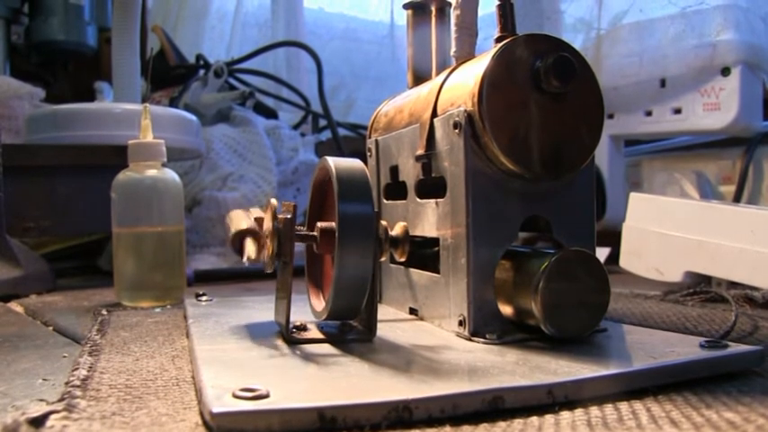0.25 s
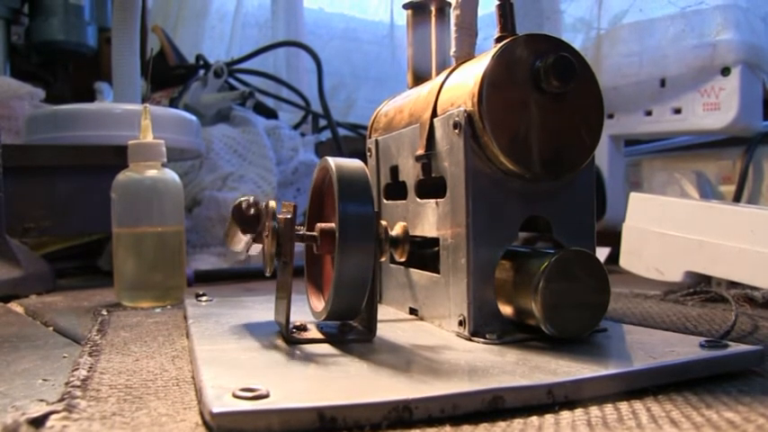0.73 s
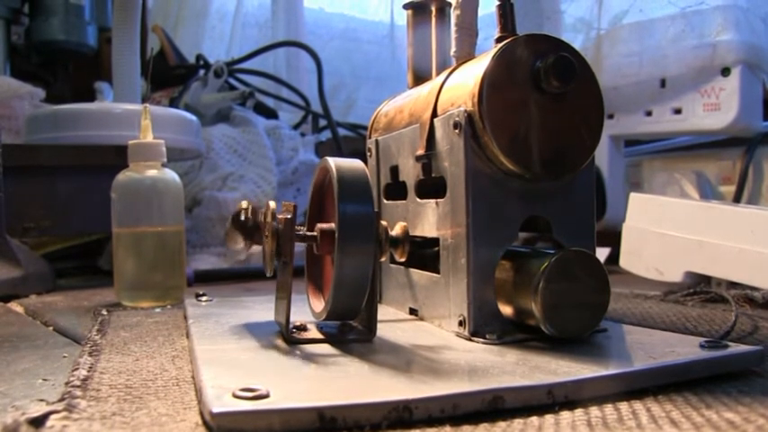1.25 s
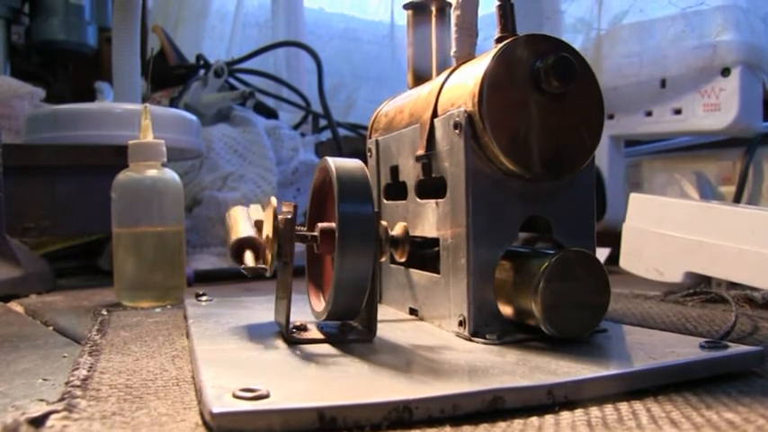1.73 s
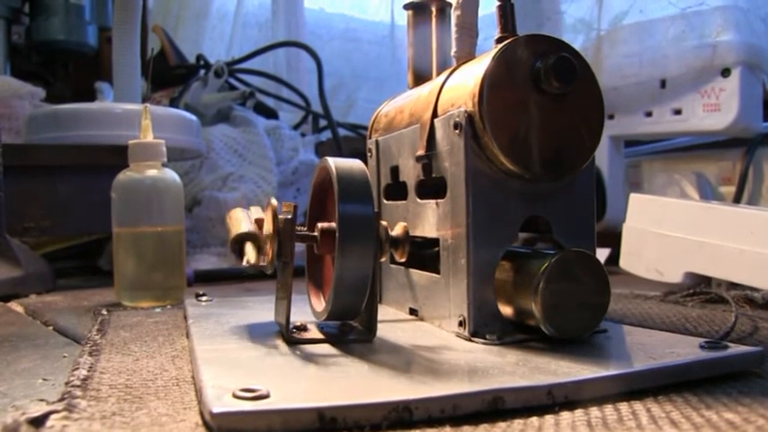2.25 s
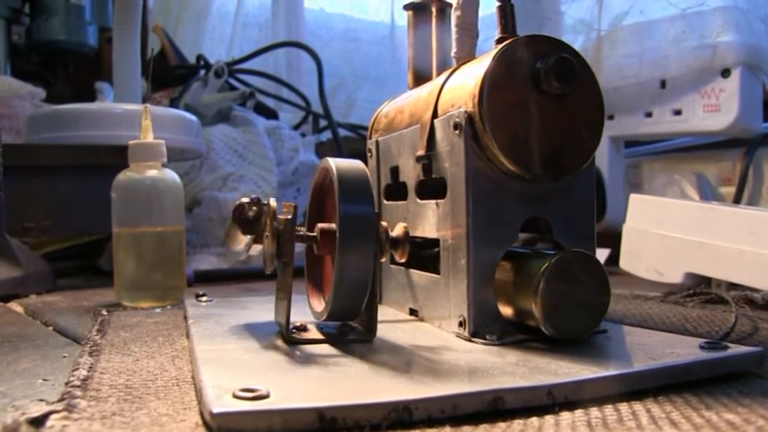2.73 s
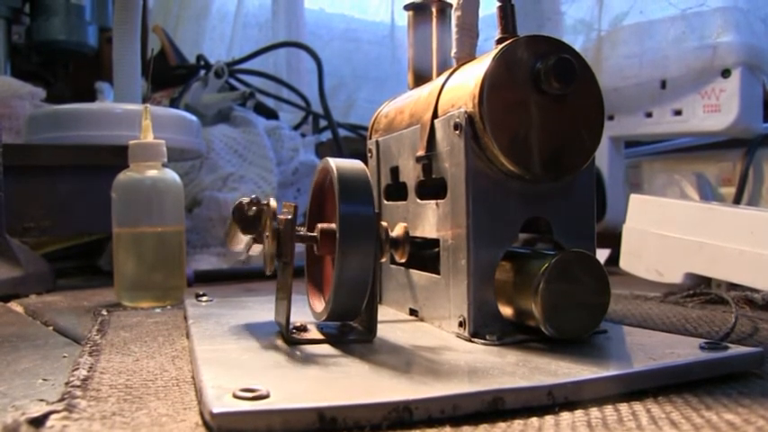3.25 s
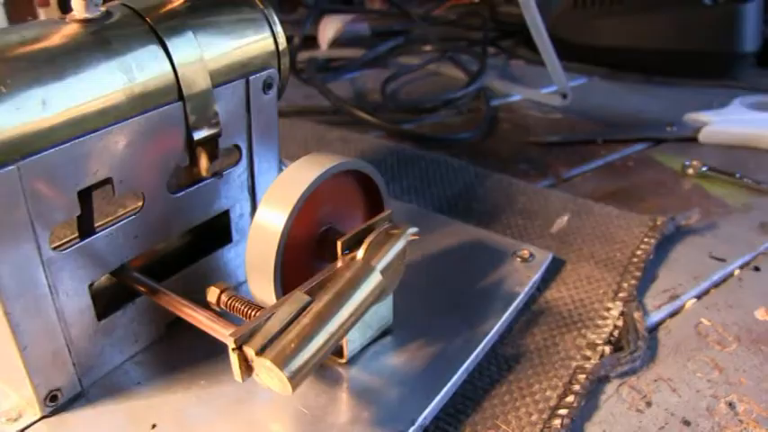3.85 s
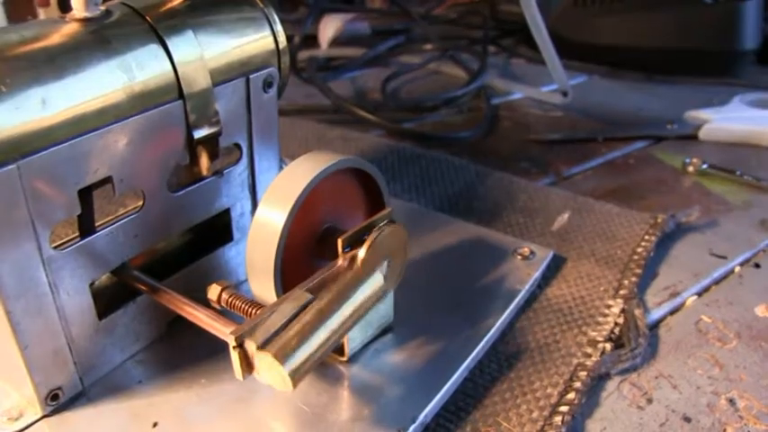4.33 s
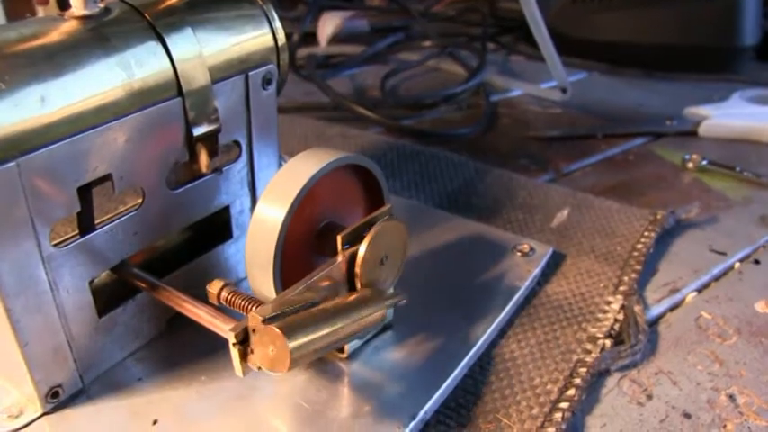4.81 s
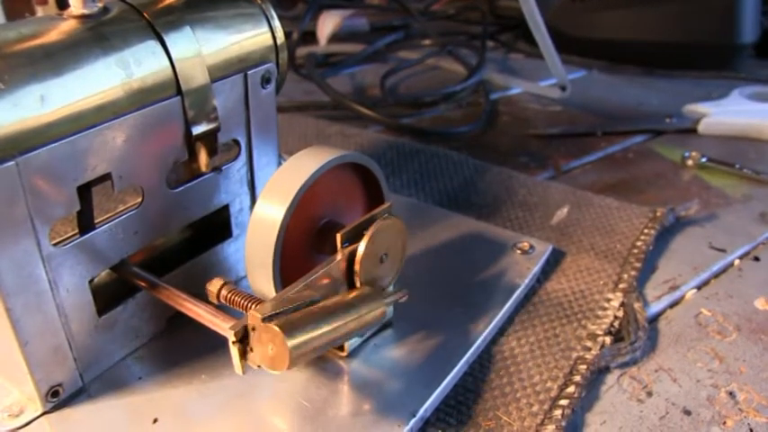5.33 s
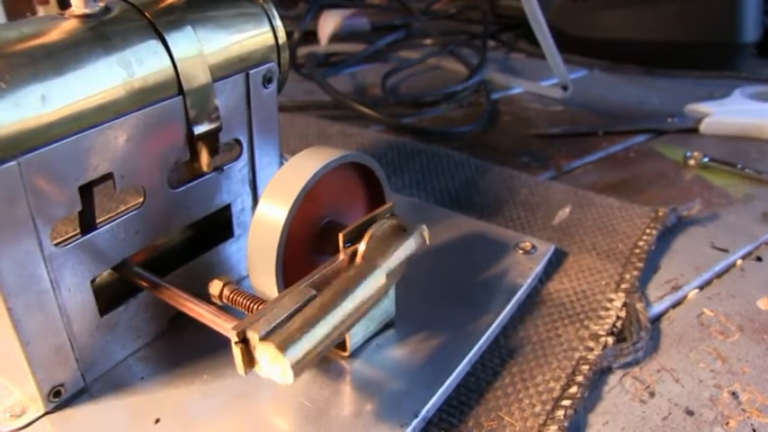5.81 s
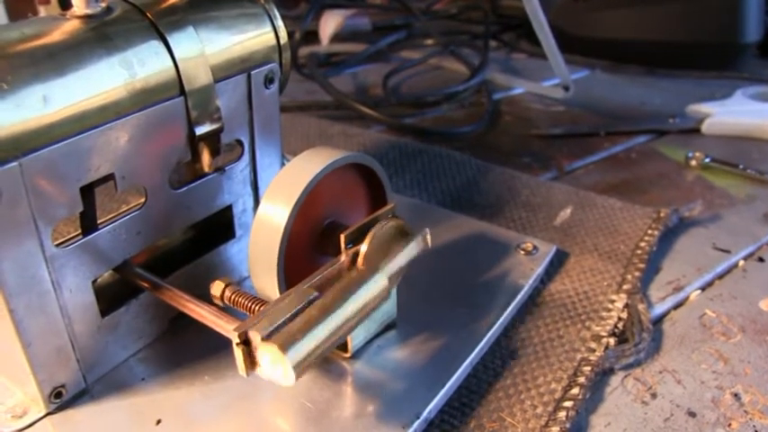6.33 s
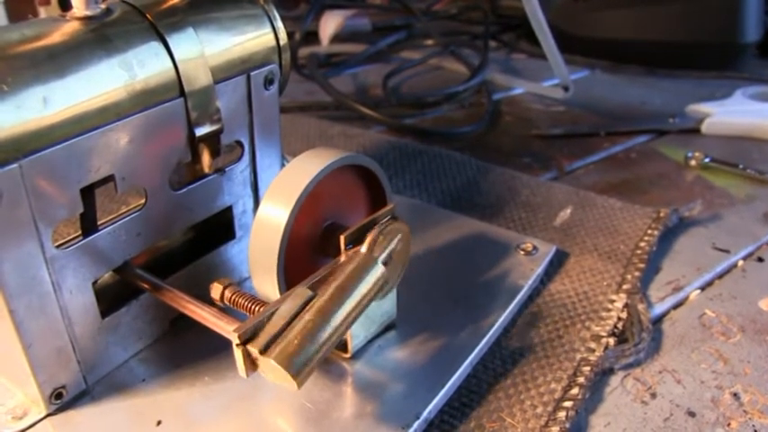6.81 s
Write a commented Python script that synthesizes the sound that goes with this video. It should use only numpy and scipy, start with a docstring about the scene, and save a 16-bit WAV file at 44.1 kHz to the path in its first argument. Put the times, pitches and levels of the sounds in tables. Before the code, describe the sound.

A toy steam engine runs with a fast, even metallic clatter over a steady hiss of leaking steam.

```python
"""On a workbench, a toy steam engine runs on a metal base plate. We listen from beside the boiler,
then, after a tiny gap, from above the cylinder. A low drone comes from far off, the burner's flame
flutters and leaking steam hisses. On every turn the slack (free play) in the crank opens with a tick
and closes with a knock, so the frame and plate ring, while the bench thuds and the exhaust port puffs."""
import sys
import numpy as np
from scipy import signal
from scipy.fft import rfft, irfft, next_fast_len
from scipy.io import wavfile
from scipy.ndimage import uniform_filter1d, map_coordinates

SR = 44100
rng = np.random.default_rng(int(sys.argv[2]) if len(sys.argv) > 2 else 0)


def unload_audio(sound):
    """Save the sound as a 16-bit wav file, at the path given as the first command line argument."""
    columns = np.transpose(np.atleast_2d(sound))
    # keep every value between -1 and 1, then stretch to whole-number steps
    steps = np.round(np.clip(columns, -1, 1) * 32767)
    wavfile.write(sys.argv[1], SR, steps.astype(np.int16))


N = 311346
BESIDE, ABOVE = 0, 1  # the listening places; anything "per place" is a pair in this order

# How long the room echoes: (frequency [Hz], time to fade by 60 dB [s])
ROOM_FADE = [(150, 0.39), (1500, 0.074), (6000, 0.079)]
# The far drone: (time [s], pitch [Hz], base level [dB])
DRONE_PATH = [(0.0, 86, -66), (2.0, 86, -64), (2.2, 71, -62), (2.55, 76, -57), (2.75, 80.3, -51.5),
              (3.1, 80, -57), (3.44, 78.7, -64), (3.62, 78, -50), (3.83, 79.8, -48), (3.89, 82, -68),
              (4.4, 85.8, -61), (5.3, 90, -57), (5.45, 87, -66), (7.06, 83, -66)]
# How alike flame or steam noise is in both ears, per place: (frequency [Hz], likeness [0 to 1])
EAR_LIKENESS = [(60, 0.17), (130, 0.17), (290, 0.55), (640, 0.49), (1410, 0.51), (3100, 0.66), (6820, 0.64),
                (15000, 0.58)], [(60, 0.25), (130, 0.18), (290, 0.7), (640, 0.5), (1410, 0.64),
                (3100, 0.44), (6820, 0.14), (15000, 0.69)]
# Which way that noise leans, per place: (frequency [Hz], left minus right [dB])
EAR_BALANCE = [(60, 29), (110, -2), (200, 4.5), (380, -3), (700, -3), (1290, -1.5), (2380, 0), (4400, -0.5),
               (8120, -0.5), (15000, 0.0)], [(60, 13), (110, 12), (200, -0.5), (380, -1.0), (700, -4),
               (1290, -6), (2380, 0.5), (4400, 4.0), (8120, 7), (15000, 1.5)]
# Tone colour of the flame, per place: (frequency [Hz], relative level [dB])
FLAME_COLOUR = [(15, -51), (25, -28), (81, -8.5), (134, -10.5), (193, -2.5), (324, -2), (401, -0.5),
                (459, -3.5), (1030, -6), (1600, -11.5), (1910, -11), (2230, -15.5), (2500, -20),
                (3250, -43), (5500, -120)], [(15, -55), (25, -20), (129, -8.5), (182, -7), (273, -2.5),
                (386, -4.5), (556, -9.5), (772, -7), (1250, -9), (1460, -16.5), (1770, -14), (2310, -17),
                (2500, -24), (3250, -50), (5500, -120)]
# Tone colour of the leak, per place: (frequency [Hz], relative level [dB])
STEAM_COLOUR = [(880, -37), (1500, -9.5), (1620, -21), (1900, -19), (2270, -11.5), (2870, -9.5), (3110, -9),
                (4060, -8.5), (4700, -10.5), (6450, -7), (8170, -7), (8660, -6), (9280, -4), (12700, -2.5),
                (15800, -7.5)], [(880, -28.5), (1500, -17), (1770, -18), (2310, -19.5), (2480, -14),
                (3400, -15.5), (3980, -12.5), (6710, -11), (7620, -9), (8840, -8), (9470, -7),
                (10900, -6.5), (12200, -5.5), (14000, -7.5), (15800, -13)]
# Bands of hiss lifted by reflections off plate and boiler, per place:
# (frequency [Hz], width [Hz], boost [dB])
STEAM_LIFTS = ([(4740, 370, 7.5), (5620, 510, 5.5), (6980, 200, 6), (8120, 500, 7.5), (9120, 200, 4.5),
               (9480, 190, 4), (10170, 300, 4.5), (12850, 370, 3)], [(4950, 270, 0), (7680, 330, 4),
               (9520, 360, 4.5), (10330, 200, 4), (10800, 240, 1), (11750, 250, 3), (12600, 600, 4),
               (13600, 150, 5)])
# The exhaust puff, per place: (start after the tick [ms], peak treble boost [dB])
EXHAUST_PUFF = [(90, 2.2), (86, 2.6)]
# The bench's low tones, per place:
# (frequency [Hz], start after the tick [ms], swell time [ms], base level [dB])
BENCH_TONES = ([(136, 14.6, 13.9, -42.6), (243.4, 18.25, 6.8, -48), (412, 21, 3.3, -43),
               (435, 29, 2.16, -43), (616, 0.86, 5.7, -42)], [(136.7, 12.5, 15.8, -49.5),
               (259.8, 10.5, 7.8, -45), (266.5, 27.5, 9.1, -45), (430, -2, 1.67, -46),
               (502, 17.5, 3.7, -55.5), (415, 22.5, 4.5, -46.5)])
# The ringing tones of frame and plate, with their base levels:
# (frequency [Hz], time to fade by 60 dB before FADE_SPEEDUP [s], knock beside [dB], tick beside [dB],
#  knock above [dB], tick above [dB], left minus right beside [dB], left minus right above [dB])
FRAME_TONES = [(611, 0.059, -52, -37.5, -63, -48, 7.5, 4), (803, 0.043, -43, -53, -32.5, -38, -2, 1),
               (975, 0.061, -50, -50.5, -37.5, -39.5, -8, 4), (1170, 0.05, -48, -46, -33, -34, 4, 0),
               (1297, 0.038, -39, -46, -29.5, -45, -5, 6), (1401, 0.052, -42, -44, -22.5, -31.5, 5, -2.5),
               (1505, 0.058, -44, -39.5, -25.5, -28.5, 0, 4),
               (1631, 0.032, -31, -43.5, -28, -32.5, -1.5, 2), (1850, 0.027, -45, -46, -80, -55, 0, -4),
               (1990, 0.036, -42, -43, -39, -48, -6, -15), (2266, 0.045, -33.5, -40.5, -29, -37.5, -2, 4),
               (2513, 0.03, -32.5, -46, -42, -58, 4, -23), (2568, 0.059, -37.5, -43, -41, -45, -4, 11),
               (2816, .025, -33.5, -56, -39, -50, -1, 8), (3193, 0.039, -52, -55, -41.5, -54, -5, 5),
               (3370, 0.026, -55, -53, -52, -66, 2, 4), (3733, 0.024, -42, -54, -40, -68, -7, -12),
               (3990, 0.039, -67, -57, -42.5, -62, 0, 2), (4550, 0.024, -39.5, -66, -36, -62, -2, 7.5),
               (4850, 0.014, -42, -64, -37.5, -64, -15, 11), (5040, 0.033, -61, -66, -37, -66, 0, 1),
               (5500, 0.033, -41.5, -61, -59, -68, 2, 2), (5520, .02, -52, -63, -43, -66, 0, 2)]
# Small bounces after a tick and after a knock, per place:
# (delay [ms], level change [dB], brightness above 1400 Hz [dB per octave])
TICK_BOUNCES = [(5.05, 2, 3), (10.92, 0, -6), (39.56, 2, -10), (54.2, -7, -5)], [(6.99, -12, 10),
                (11.92, -7.5, -4), (48, -17, -4)]
KNOCK_BOUNCES = [(4.5, -3, -1), (9, -16.5, -2), (15, -6, -14)], [(5.5, -11.5, 5.7), (11, -22, 2.3),
                 (17, -16, 3)]
# The slack closes once a turn: (time [s], strength [dB], sharpness above 2000 Hz [dB per octave])
CRANK_KNOCKS = [(-0.0194, 0, 0), (0.1145, 3, 2.0), (0.2484, 2, 2.5), (0.3822, 0, 1.0), (0.5155, 0.9, 0.5),
                (0.6489, 1, 0.7), (0.782, 1.5, 0.5), (0.9151, 0.5, 0), (1.0485, 0.5, 0), (1.1814, 2, 1.5),
                (1.3143, 2.2, 2), (1.4472, 1.5, -2), (1.5801, -14, -3), (1.713, 1.3, 0.9), (1.8454, 2, 3.5),
                (1.9789, 0.3, -1.0), (2.1116, -6, -6), (2.2442, 0, -2), (2.3766, 1.8, -3.7),
                (2.5083, 2.5, 0.9), (2.6399, 0.5, -2), (2.7708, 4.0, 1.5), (2.902, 1.5, 3),
                (3.0333, 0, 1.7), (3.1647, -1, -1.9), (3.2954, 0.5, -1), (3.426, -0.0, 2),
                (3.5568, 0.5, 0.3), (3.6875, -1, 0.5), (3.8178, 0, 2.5), (3.8863, 1.5, 4),
                (4.015, 0.2, 1.5), (4.1435, 0.8, -3), (4.2723, -1.5, -6), (4.4005, 1.5, 3),
                (4.5294, 1.5, 2.5), (4.6595, -0.8, -2.2), (4.7889, 1, 1.5), (4.9186, 0, 3),
                (5.0498, -4, -1), (5.1801, -0.5, 1), (5.3111, -4, -6.0), (5.441, 1, 4), (5.5717, -0.5, 2),
                (5.702, -1.8, -6), (5.8316, -1.5, 1.0), (5.961, -12, -6), (6.0906, -0.7, -1),
                (6.22, -2.8, -4.5), (6.3496, -2, -3.4), (6.4784, 2, 3), (6.6076, 1, 1), (6.737, -11, -3),
                (6.8662, -9.5, -8), (6.996, -4, -8)]

GAP_START_S, GAP_END_S = 3.8668, 3.8724  # near silence between the two places
SLACK_MS = 18.1  # the tick comes this long before the knock
FADE_SPEEDUP = 1.294, 1.3  # per place: the metal's ring dies this many times faster
TICK_DB, THUD_DB = (-3.3, -2.5), (0.6, 2.4)  # per place, added to the base levels
STEAM_DB, BURNER_DB = (-39.1, -35.1), (-47, -44)  # base levels per place


def amp(db):
    """Turn decibels into a number to multiply by."""
    return 10 ** (np.asarray(db) / 20)


def unit(x):
    """Scale a signal to an average (rms) size of 1."""
    return x / np.sqrt(np.mean(x ** 2) + 1e-20)


def along(points, hz):
    """Read between (frequency, value) points, on a scale of octaves."""
    freqs, values = np.transpose(points)
    return np.interp(np.log(hz + 1), np.log(freqs + 1), values)


def wobble(rate):
    """A smooth curve through `rate` random values a second."""
    return map_coordinates(rng.standard_normal(int(N * rate / SR) + 4), [np.arange(N) * rate / SR])


def filtered(x, response):
    """Turn each frequency of x up or down by response(hz)."""
    size = next_fast_len(N + 8192)
    return irfft(rfft(x, size) * response(np.fft.rfftfreq(size, 1 / SR)), size)[..., :N]


def rushing_noise(colour_db, place, patchy_db):
    """Stereo noise with a given tone colour and random louder and softer patches."""
    spectrum = signal.stft(rng.standard_normal((2, N)), nperseg=512)[2]
    patches = uniform_filter1d(uniform_filter1d(rng.standard_normal(spectrum.shape[1:]), 6, 0), 8, 1)
    noise = signal.istft(spectrum * amp(patchy_db * unit(patches)), nperseg=512)[1][:, :N]
    spread = lambda hz: np.arccos(np.clip(along(EAR_LIKENESS[place], hz), 0, 1)) / 2
    mid, side = filtered(noise, lambda hz: amp(colour_db(hz)) * [np.cos(spread(hz)), np.sin(spread(hz))])
    balance = lambda hz: amp(np.outer([.5, -.5], along(EAR_BALANCE[place], hz)))
    return unit(filtered(np.array([mid + side, mid - side]), balance))


def knocks_at(place):
    """The knocks heard from this place: beside before the gap, above after it."""
    return [row for row in CRANK_KNOCKS if (row[0] > GAP_START_S) == place]


def tick_times(place):
    """The times, in seconds, when the slack opens."""
    return np.array([s - SLACK_MS / 1000 for s, _, _ in knocks_at(place)])


def swell(place, delay_ms, rise_ms):
    """A bump of height 1 once a turn, starting delay_ms after the tick."""
    t = np.arange(N) / SR
    starts = tick_times(place) + delay_ms / 1000
    latest_start = starts[(np.searchsorted(starts, t) - 1).clip(0)]
    age = (t - latest_start).clip(0) * 1000 / rise_ms
    return age * np.exp(1 - age)


def room(x, echo_db):
    """Add the echo from the walls, in which low notes last longest."""
    hz, t, spectrum = signal.stft(rng.standard_normal((2, SR // 3)), SR, nperseg=256)
    tail = signal.istft(spectrum * amp(-60 * t / along(ROOM_FADE, hz)[:, None]), SR, nperseg=256)[1]
    delayed = np.pad(x, ((0, 0), (200, 0)))
    echo = signal.fftconvolve(delayed, tail / np.linalg.norm(tail[0]), axes=1)[:, :N]
    return x + amp(echo_db) * echo


def drone():
    """A low tone from far off comes and goes, stronger on the left."""
    times, *columns = np.transpose(DRONE_PATH)
    hz, db = [np.interp(np.arange(N) / SR, times, column) for column in columns]
    tone = np.sqrt(2) * np.sin(2 * np.pi * np.cumsum(hz) / SR)
    return tone * amp(db + 1.5 * wobble(7.1)) * amp([[3.6], [-4.6]])


def burner(place):
    """The flame flutters under the boiler."""
    flutter = amp(BURNER_DB[place] + 0.47 * wobble(12))
    return flutter * rushing_noise(lambda hz: along(FLAME_COLOUR[place], hz), place, patchy_db=1.0)


def steam(place):
    """The leak hisses on: its treble puffs at the exhaust, its lower part grows as the cylinder rocks."""
    ripple_db = 1.08 * rng.standard_normal(400)  # many weak reflections ripple the tone colour
    lifts = lambda hz: sum(db / (1 + (2 * (hz - centre) / width) ** 2)
                           for centre, width, db in STEAM_LIFTS[place])
    colour = lambda hz: along(STEAM_COLOUR[place], hz) + map_coordinates(ripple_db, [hz / 60]) + lifts(hz)
    hiss = amp(STEAM_DB[place] + 0.21 * wobble(12)) * rushing_noise(colour, place, patchy_db=0.72)
    lower = filtered(hiss, lambda hz: 1 / (1 + (hz / 6500) ** 8))
    delay_ms, puff_db = EXHAUST_PUFF[place]
    puff = amp(puff_db * swell(place, delay_ms, rise_ms=4.5))
    rocking = amp(1.77 * swell(place, delay_ms=-7.5, rise_ms=16.5))
    return (hiss - lower) * puff + lower * rocking


def bench_thud(tick_s, thud_db, place):
    """Softly pushed, the bench's tones swell, sink and linger. Gives (start sample, sound) pairs."""
    t = np.arange(SR // 10) / SR
    sounds = []
    for hz, delay_ms, swell_ms, db in BENCH_TONES[place]:
        age = t * 1000 / swell_ms
        push = (age * np.exp(1 - age)) ** 3.16
        linger = .5 * age ** 2 / (1 + age ** 2) * np.exp(-age / 2.3)
        level_db = db + thud_db + rng.normal(0, 0.004) * hz  # higher tones vary most
        tone = amp(level_db) * (push + linger) * np.sin(2 * np.pi * hz * t)
        sounds.append((round((tick_s + delay_ms / 1000) * SR), tone * amp([[-1.8], [1.6]])))
    return sounds


def metal_strike(time_s, blow_db, place, bounces, is_tick, scatter_db, sharp_db=0):
    """A blow and its bounces make frame and plate ring. Gives (start sample, sound) pairs."""
    hz, fade_s, *levels = np.transpose(FRAME_TONES)
    t = np.arange(SR // 16) / SR
    bright_db = sharp_db * np.log2(hz / 2000).clip(0)  # sharp blows are short and reach the high tones
    balance_db = np.outer([.5, -.5], levels[4 + place])
    level_db = levels[2 * place + is_tick] + blow_db + bright_db + balance_db
    loose_hz = hz * (1 + rng.normal(0, .011, hz.shape))  # loose joints detune every ring a little
    rise = 1 - np.exp(-t / 0.00016)
    fade = amp(-60 * FADE_SPEEDUP[place] * np.outer(1 / fade_s, t))
    ring = rise * fade * np.sin(2 * np.pi * np.outer(loose_hz, t))
    ring *= (-1) ** np.arange(len(hz))[:, None]  # neighbours start opposite ways, so the ring swells first
    octaves = np.log2(hz / 1400)
    light_db = 6 * octaves.clip(max=0)  # bounces are too light to move the low tones much
    blows = [(0, 0.011)]  # the first contact: (delay [ms], level change [dB])
    for ms, db, brightness in bounces[place]:
        blows.append((ms + rng.normal(0, .1), db + brightness * octaves.clip(0) + light_db))
    sounds = []
    for ms, db in blows:
        gains = amp(level_db + db + rng.normal(0, scatter_db, hz.shape))
        sounds.append((round((time_s + ms / 1000) * SR), gains @ ring))
    return sounds


def crank(place):
    """On every turn the slack ticks open and knocks shut, and the bench thuds."""
    hits = []
    for s in tick_times(place):
        tick_db, thud_db = rng.normal([TICK_DB[place], THUD_DB[place]], .3)
        hits += metal_strike(s, tick_db, place, TICK_BOUNCES, is_tick=True, scatter_db=2.6)
        hits += bench_thud(s, thud_db, place)
    for s, db, sharp_db in knocks_at(place):
        hits += metal_strike(s, db, place, KNOCK_BOUNCES, is_tick=False, scatter_db=1.9, sharp_db=sharp_db)
    out = np.zeros((2, N + 2 * SR))  # a spare second at each end: a turn is under way at the start
    for start, sound in hits:
        out[:, SR + start:SR + start + sound.shape[1]] += sound
    return out[:, SR:SR + N]


def scene():
    """The engine from beside the boiler until the gap, then from above the cylinder."""
    far = drone()
    beside = room(crank(BESIDE), echo_db=-8.5) + steam(BESIDE) + burner(BESIDE) + far
    above = room(crank(ABOVE), echo_db=-16) + steam(ABOVE) + burner(ABOVE) + far
    t = np.arange(N) / SR
    fade_out = ((GAP_START_S - t) * 2000).clip(.04, 1) * (t < GAP_END_S)
    fade_in = ((t - GAP_END_S) * 2000).clip(0, 1)
    return beside * fade_out + above * fade_in


def record(dry):
    """Soften the deepest bass and cut off the highest treble."""
    bass_hz, top_hz = 30, 15780
    return filtered(dry, lambda hz: (hz < top_hz) * hz ** 2 / (hz ** 2 + bass_hz ** 2))


dry = scene()
out = record(dry)
unload_audio(out)
```